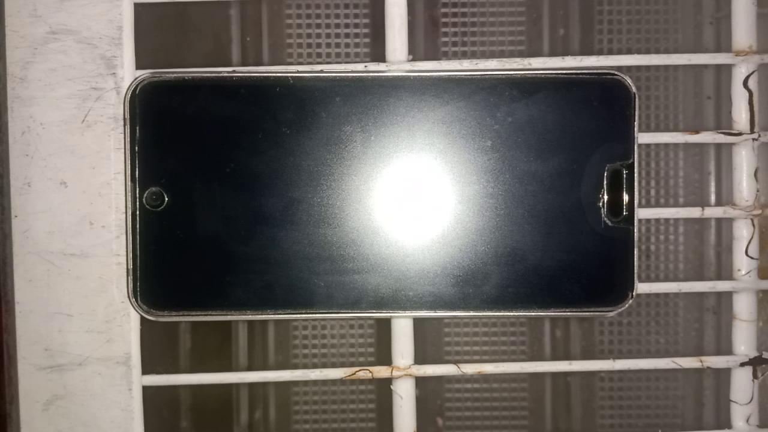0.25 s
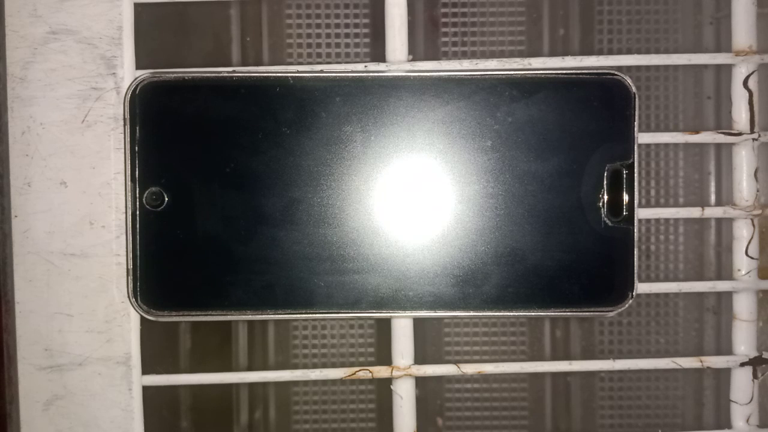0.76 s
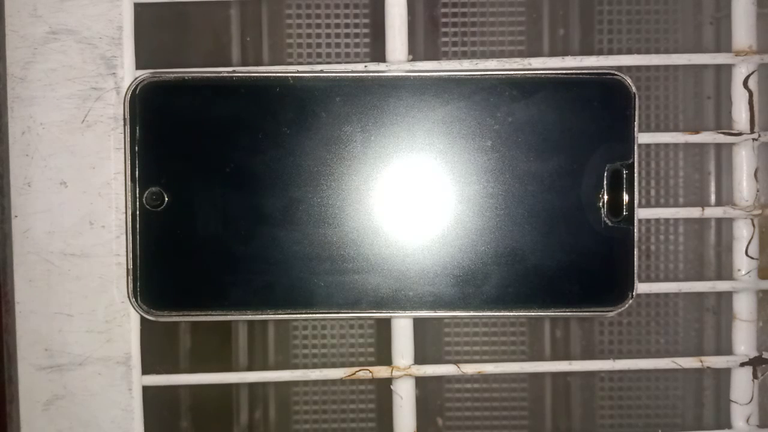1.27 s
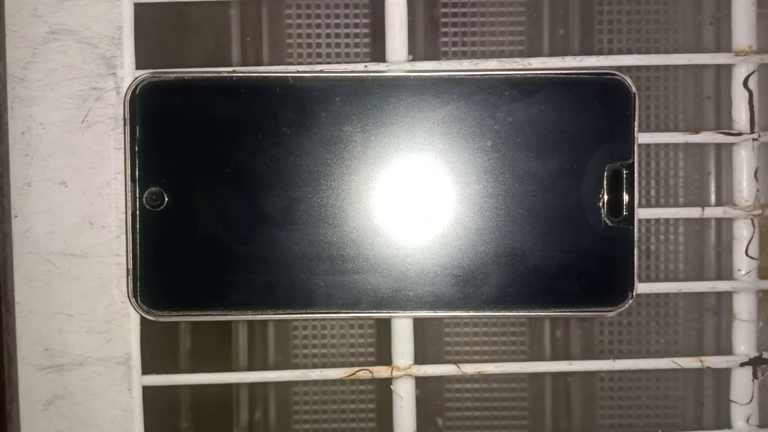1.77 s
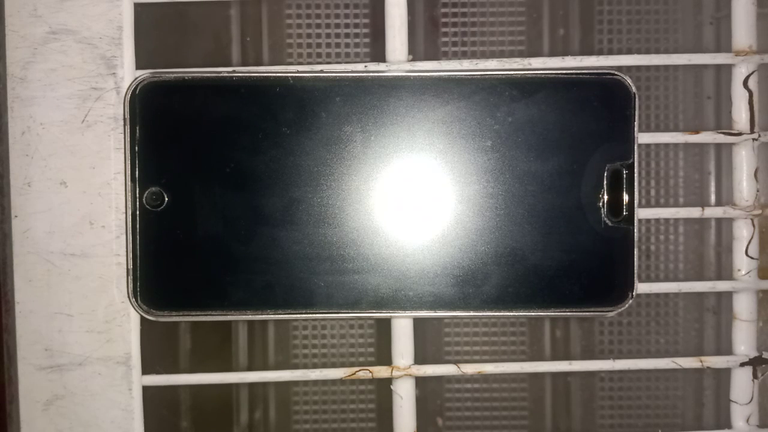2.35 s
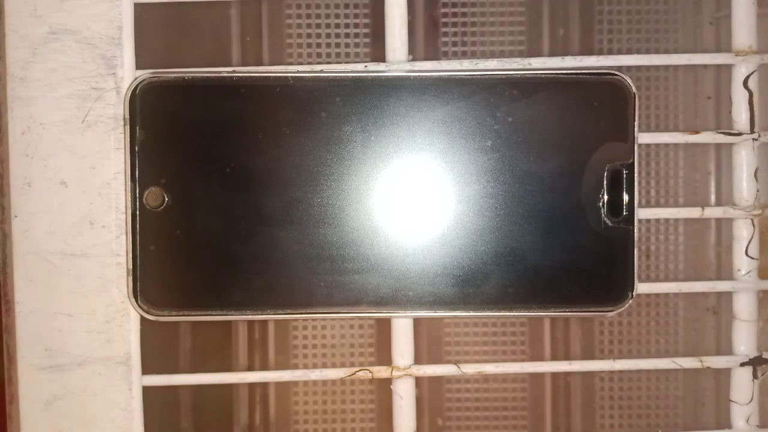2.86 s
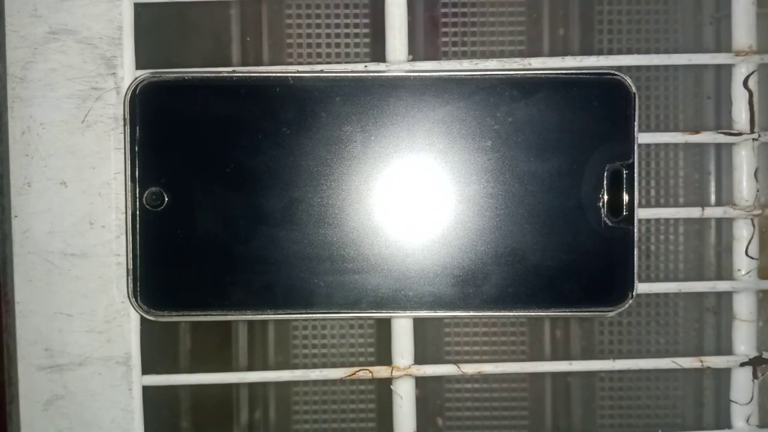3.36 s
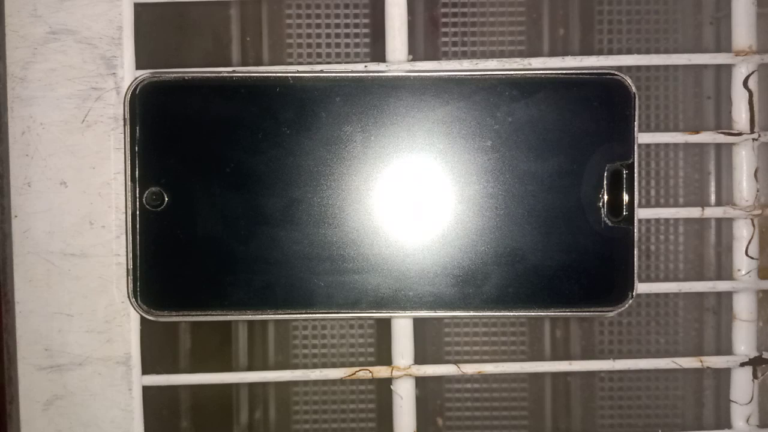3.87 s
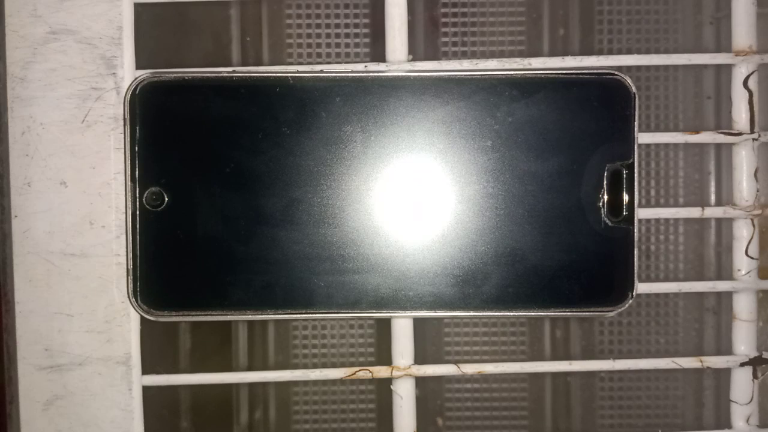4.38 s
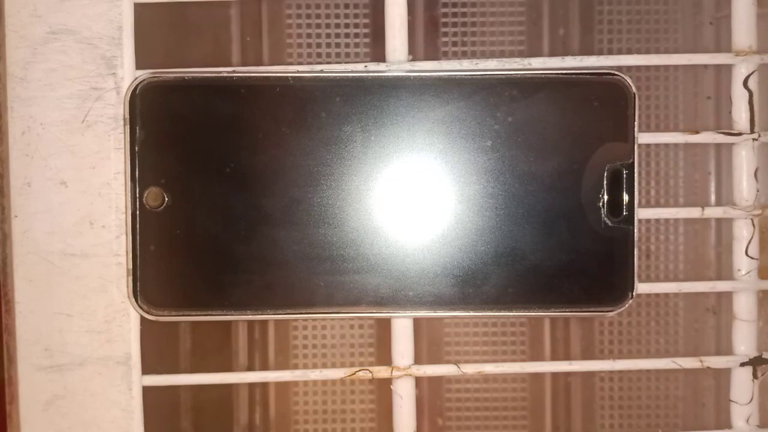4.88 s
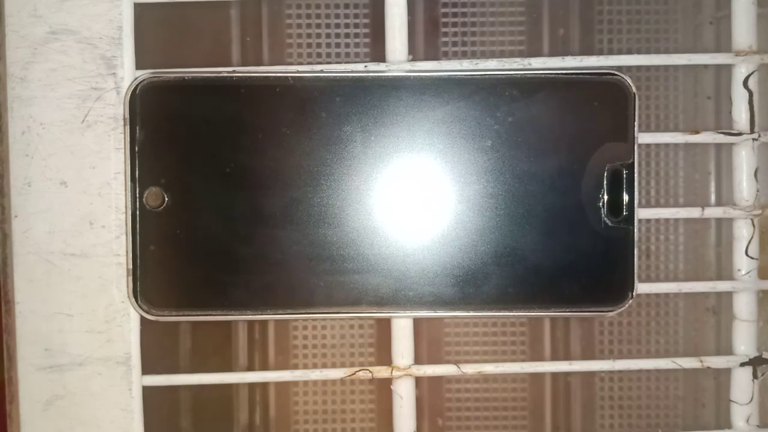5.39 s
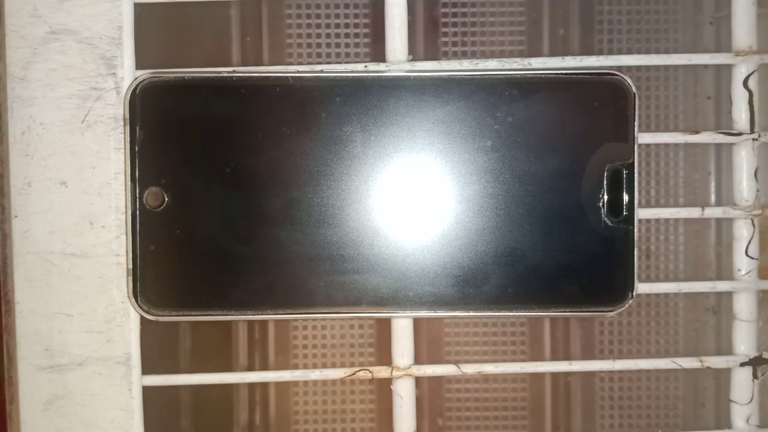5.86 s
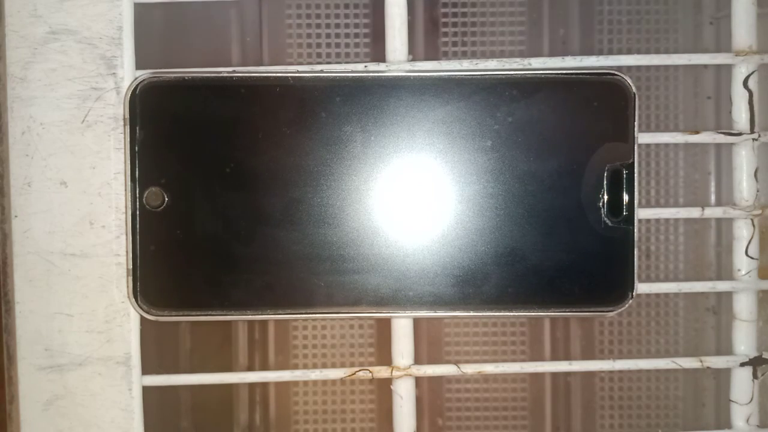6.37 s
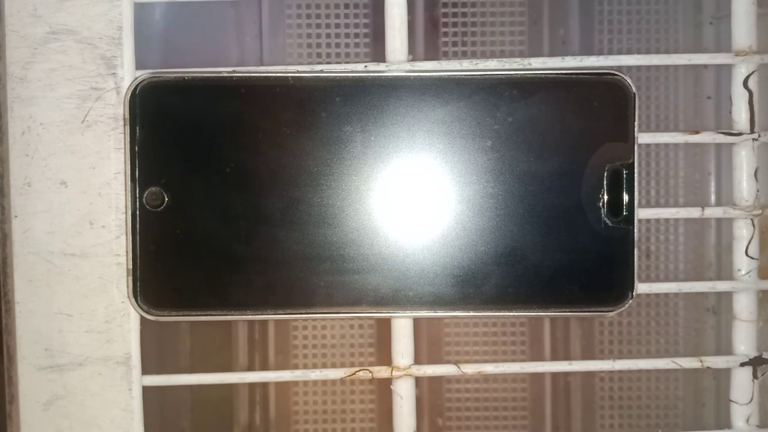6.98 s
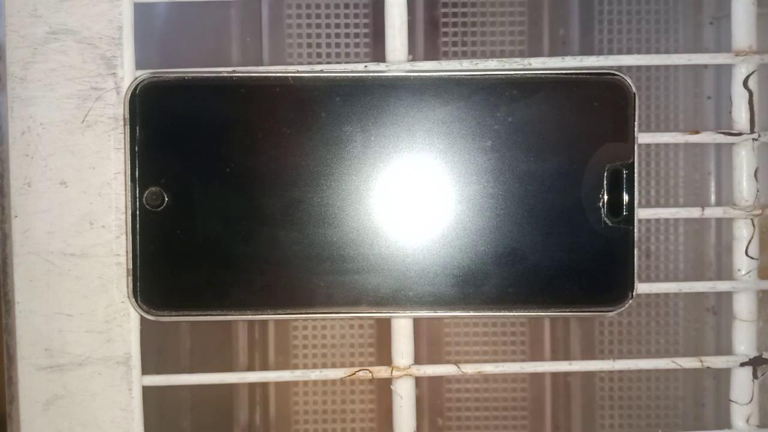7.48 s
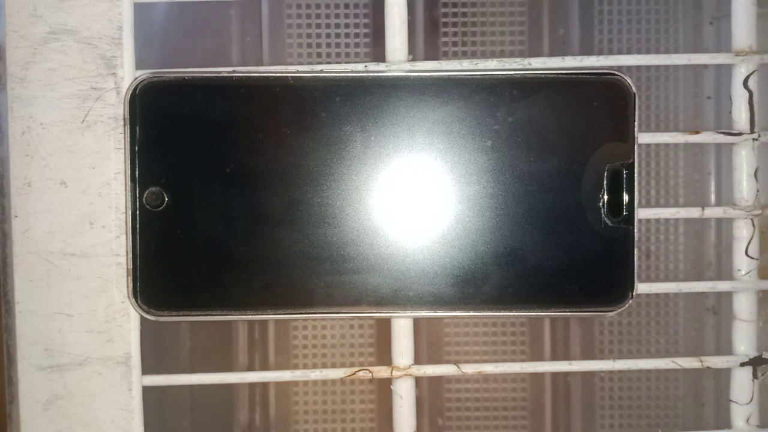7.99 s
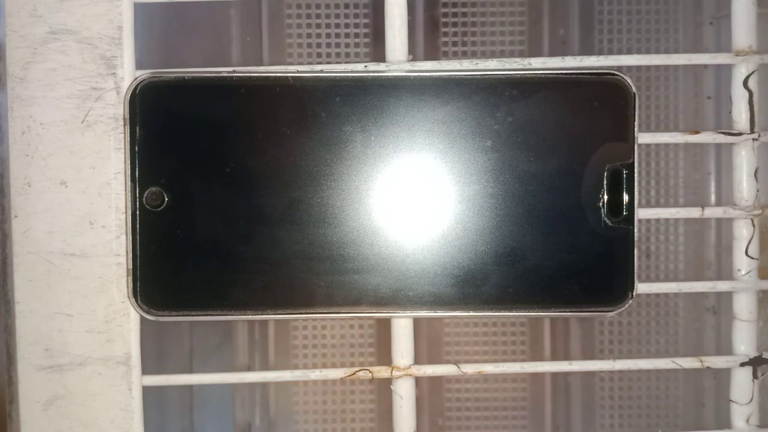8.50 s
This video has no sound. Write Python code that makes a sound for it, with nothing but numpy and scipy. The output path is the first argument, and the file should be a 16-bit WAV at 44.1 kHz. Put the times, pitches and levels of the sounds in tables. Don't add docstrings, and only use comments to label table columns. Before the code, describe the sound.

A refrigerator compressor runs throughout, heard close and dry by a hand-held microphone with little sense of room. From 0 to 0.8 s it is a thin airy hum with soft hiss, a low bump and knock near 0.3 s and a short finger scuff at 0.4 s. From 0.8 to 1.15 s thumps and a rapid cluster of hard casing knocks mark the set-down. Until 4.7 s a steadier, fuller drone continues, with a wavering mid-low panel tone, faint high whine, light rustles and tiny dry ticks. Knocks with brief metallic ringing come at 4.8, 5.25 and 5.8 s. From about 6 s the microphone slides toward the pump: low hum around 100 Hz swells strongly by 7.5 s, buzzing and beating, with more air noise. Small clicks at 7.8-7.9 s and 8.4 s, and a bright ping at 8.6 s, end it near 8.7 s, still humming.

```python
import sys
import numpy as np
from scipy import signal
from scipy.io import wavfile
from scipy.ndimage import uniform_filter1d

SR = 44100
rng = np.random.default_rng(int(sys.argv[2]) if len(sys.argv) > 2 else 0)


def bounce(signal):
    frames = np.transpose(np.atleast_2d(signal))
    limited = np.clip(frames, -1, 1)
    pcm = np.round(limited * 32767).astype(np.int16)
    wavfile.write(sys.argv[1], SR, pcm)


def gain_from_db(level_db):
    decades = np.asarray(level_db, float) / 20
    return 10 ** decades


N = 385434
T = np.arange(N) / SR
SHAFT_HZ, MAINS_HZ = 49.3846, 50.3
SEATED, NEAR, FACED = 1, 2, 3
# (time [s], length [s], rise [dB])
RUBS = [(0, 0.022, 14), (.15, .04, 5), (.285, .04, 7), (.99, 0.12, 12), (1.07, .06, 15.5), (1.24, .08, 5),
        (1.46, .22, 5), (2.63, .04, 6), (2.76, 0.08, 11), (3.03, .045, 11), (3.11, .055, 12), (3.2, .07, 8),
        (4.14, 0.15, -4), (4.69, .03, 5), (4.78, .03, 7), (5.31, .11, 12), (5.43, 0.085, 11),
        (6.29, .04, 5), (7.15, .06, 4), (7.83, 0.16, 4), (8.52, 0.034, 6), (8.68, .03, 5), (8.74, .04, 8)]


def evened(x):
    return x / np.sqrt(np.mean(x ** 2) + 1e-20)


def add(mix, s, sound):
    part = mix[round(s * SR):][:len(sound)]
    part += sound[:len(part)]


def band(x, lo_hz, hi_hz):
    return signal.sosfilt(signal.butter(4, [lo_hz, min(hi_hz, SR / 2.2)], "band", fs=SR, output="sos"), x)


def waver(rate_hz):
    t = T[::256]
    sines = 0
    for hz in np.geomspace(.2, 1, num=16) * rate_hz:
        sines = sines + np.sin(2 * np.pi * (hz * t + rng.random())) / np.sqrt(hz / rate_hz)
    return np.interp(T, t, evened(sines))


def tone(hz, db, turns, waver_db=0.):
    return np.sqrt(2) * gain_from_db(db + waver_db * waver(4)) * np.cos(2 * np.pi * (hz * T + turns))


def noise(points, patchy_db, flicker_db, size, peaks=()):
    hz = np.fft.rfftfreq(size, 1 / SR)
    real, imag, patches = rng.standard_normal((N // (size // 4) + 5, len(hz), 3)).T
    f, db = np.transpose(points)
    colour = np.interp(np.log(hz + 1), np.log(f + 1), db, left=-90, right=-90)
    for at_hz, width_hz, up_db in peaks:
        colour = colour + up_db / (1 + (2 * (hz - at_hz) / width_hz) ** 2)
    patches = uniform_filter1d(patches, size=8, axis=0)
    patches = evened(uniform_filter1d(patches, size=6, axis=1))
    flicker = rng.standard_normal(real.shape[1])
    spectra = (real + 1j * imag) * gain_from_db(colour[:, None] + patchy_db * patches + flicker_db * flicker)
    return evened(signal.istft(spectra, nperseg=size, noverlap=size - size // 4)[1][:N])


def placed(column):
    # (time [s], seated on the panel [0-1], nearness to the pump [0-1], turned to face it [0-1])
    path = [
        (0, 0.03, 0, 0),
        (.82, 0.14, 0, 0),
        (1.1, 0.98, 0, 0),
        (5.9, 0.98, 0, 0),
        (6.3, 0.96, 0.27, .15),
        (6.7, 0.97, 0.64, .33),
        (7.05, 1, 0.87, .52),
        (7.45, 1, 1, .78),
        (7.85, 1, 1, 1),
        (8.74, 0.98, 0.99, 1),
    ]
    table = np.transpose(path)
    return np.clip(np.interp(T, table[0], table[column]), 0, 1)


def heard(air_db, panel_db, pump_db, lateness, column=NEAR):
    return air_db + (panel_db - air_db) * placed(SEATED) + (pump_db - panel_db) * placed(column) ** lateness


def swells(rows, column=2, edge=2):
    t = T[::32]
    rises = sum(row[column] * np.exp(-abs(2 * (t - row[0]) / row[1]) ** edge) for row in rows)
    return np.interp(T, t, rises)


def crackle():
    grains_per_s = 9
    size = gain_from_db(3 * np.minimum(rng.exponential(1, N), 3)) * (rng.random(N) < grains_per_s / SR)
    kind, t = rng.integers(0, 3, N), T[:1500]
    out = np.zeros(N)
    for k, hz in enumerate((8500, 11000, 13000)):
        grain = band(gain_from_db(-60 * t / .04) * rng.standard_normal(len(t)), .88 * hz, 1.12 * hz)
        out += signal.oaconvolve(size * (kind == k), grain)[:N]
    return gain_from_db(-62) * out


def grip():
    # (frequency [Hz], level [dB])
    rustle_tone = [(5000, -19), (7400, -7.5), (8800, 4.5), (10500, -4.5), (11600, -4), (12200, -5.5),
                   (12900, -5), (13500, -5), (14300, -5.5), (15500, -5.5)]
    # (frequency [Hz], width [Hz], rise [dB])
    rub_modes = [(8500, 400, 4), (10600, 200, 4), (11600, 300, 8), (12800, 350, 9), (14100, 600, 7)]
    # (time [s], peak [dB], centre [Hz])
    ticks = [(0.2967, -51, 8160), (0.4359, -51, 9400), (0.9243, -40.5, 8300), (0.9777, -42, 8480),
             (1.0256, -38, 8600), (1.1199, -42, 8630), (1.4222, -47, 8940), (2.0672, -47, 8670),
             (2.6244, -50, 9450), (2.837, -46, 8390), (3.3902, -51, 8790), (3.7419, -52, 8780),
             (4.3774, -47, 5010), (4.776, -47, 8630), (4.8, -50, 8400), (5.245, -41, 8760),
             (5.3118, -52, 8430), (5.5972, -50, 8940), (5.9344, -47, 8300), (6.4398, -48.5, 8420),
             (7.4599, -47, 5430), (7.7657, -43, 8370), (7.8052, -37, 8860), (7.9194, -44, 8680)]
    # (time [s], peak [dB], centre [Hz])
    snaps = [(0.4718, -49.5, 12500), (0.9253, -47, 13100), (1.053, -48, 13400), (1.7255, -57, 13800),
             (2.624, -37.5, 13600), (2.6988, -54, 12900), (2.7846, -49, 12700), (3.0145, -54, 13900),
             (3.0849, -50, 12700), (3.3907, -53, 13600), (3.4715, -55, 13300), (3.8541, -51, 11100),
             (3.917, -50, 14000), (4.0093, -51, 14300), (4.3725, -54, 13000), (4.5121, -57, 13600),
             (4.5825, -50.5, 13600), (4.8618, -54.5, 13600), (5.0464, -50, 13200), (6.4926, -51.5, 12800),
             (7.001, -51, 13300), (7.1327, -50, 12000), (7.6031, -53, 12900), (7.7653, -46.5, 12800),
             (7.8047, -44, 12100), (7.9199, -52, 11200), (8.2851, -50.5, 13400), (8.5195, -40, 13000),
             (8.6223, -52, 12300), (8.6697, -50, 13200)]
    # (time [s], peak [dB], centre [Hz])
    faint_snaps = [(0.0717, -57, 9830), (0.2783, -56, 10000), (0.5586, -58, 10800), (0.6409, -57, 13900),
                   (1.1204, -50, 9800), (1.4207, -54, 9920), (1.7749, -56, 12800), (2.0323, -55, 12800),
                   (2.1161, -56, 14900), (2.5466, -57, 11600), (2.7362, -49, 12900), (2.9148, -59, 10900),
                   (2.9332, -57, 10800), (3.1737, -54, 14200), (3.2156, -54, 12800), (4.2454, -54, 14200),
                   (4.6748, -57, 11100), (4.7716, -54, 12800), (5.2594, -52, 12700), (5.6645, -59, 10000),
                   (6.2846, -56, 9970), (6.3919, -55, 14900), (6.4393, -53, 10100), (7.0399, -54, 10200),
                   (7.1082, -51, 13400), (7.1656, -52, 9880), (7.6655, -54, 10400), (8.6812, -51, 14500)]
    # (time [s], peak [dB], centre [Hz])
    taps = [(.925, -45, 6300), (2.0674, -47, 6600), (2.837, -50, 5900), (4.8, -54, 6490),
            (7.0359, -53, 5600), (7.8047, -44, 5660), (.44, -54, 6000), (1.03, -46, 6300),
            (3.74, -52, 6200), (3.858, -53, 5800), (4.378, -50, 6500)]
    # (from [s], to [s], level [dB])
    whistles = [
        (1.2, 2.55, -.5),
        (3.0, 4.75, -2),
    ]
    # (frequency [Hz], level [dB])
    circuit = [(7311, -91), (8398, -78), (9335, -80), (9728, -78), (9927, -92)]
    rub_db = heard(-74.5, -73.5, -68.5, lateness=1.5) + swells(RUBS, edge=4)
    out = gain_from_db(rub_db + 1.0) * noise(rustle_tone, 2.2, 1.6, size=256, peaks=rub_modes)
    t = T[:5000]
    # (events, t60 [s], half-width as a share of the centre, trim [dB])
    kinds = ((ticks, .06, .14, -10.5), (snaps, .07, .16, -9), (faint_snaps, .06, .11, -12), (taps, .05, .16, -11))
    for rows, t60, share, trim_db in kinds:
        for s, db, hz in rows:
            snap = evened(band(rng.standard_normal(len(t)), (1 - share) * hz, min((1 + share) * hz, 15100)))
            shape = (1 + .9 * np.exp(-t / 0.003)) * np.minimum(t / .001, 1)
            add(out, s, gain_from_db(db + trim_db - 60 * t / t60) * shape * snap)
    on = sum(gain_from_db(db) * np.clip(np.minimum(T - start, stop - T) / 0.06, 0, 1) for start, stop, db in whistles)
    return out + on * sum(tone(hz, db, rng.random(), 1.6) for hz, db in circuit)


def pings():
    # (time [s], peak [dB], frequency [Hz], t60 [s])
    struck = [(1.084, -25, 1045, 0.14), (4.8, -33, 2500, .06), (5.245, -29, 1750, .05),
              (5.249, -30, 1000, .06), (5.829, -38, 3130, .05), (7.852, -32, 3460, .035),
              (7.869, -29, 3370, 0.033), (7.894, -38, 3150, .025), (7.921, -44, 4780, 0.04),
              (8.392, -33, 2200, .06), (8.42, -37, 2400, .07), (8.615, -18, 2470, 0.036),
              (8.617, -31, 3340, 0.077), (8.62, -33, 1900, .07), (8.618, -32, 2930, .055),
              (8.6986, -33, 3370, 0.04)]
    out, t = np.zeros(N), T[:6000]
    for s, db, hz, t60 in struck:
        pair = np.sin(2 * np.pi * hz * t) + .35 * np.sin(2 * np.pi * (hz - 120) * t)
        add(out, s, gain_from_db(db + 2.5 - 60 * t / t60) * (1 - np.exp(-t / 0.0011)) * pair)
    return out


def thumps():
    # (time [s], peak [dB], frequency [Hz], length [cycles])
    pushes = [(0.2, -24, 62, 1.2), (.329, -21, 54, 1.1), (.331, -28, 262, 3.5), (0.355, -32, 199, 2.6),
              (.822, -25, 70, 1.8), (.85, -23.5, 134, 4.2), (0.863, -15, 258, 3.4), (.899, -27, 307, 4.2),
              (0.952, -24, 324, 5.3), (0.996, -23, 303, 4.1), (1, -27, 53.5, 1.7), (1.068, -13, 75.4, 0.88)]
    out = np.zeros(N)
    for s, db, hz, cycles in pushes:
        turns = hz * T[:round(cycles * SR / hz)]
        add(out, s - .004, gain_from_db(db) * np.hanning(len(turns)) * np.sin(2 * np.pi * turns))
    return out


def ring(upper_db):
    # (frequency [Hz], level [dB], t60 [s])
    casing_modes = [(700, 0, .07), (1036, 0, .07), (1670, -5, .055), (1830, -5, .055), (2010, -7, .05),
                    (2200, -6, .04), (2390, -5, .04), (2720, -11, .05), (2970, -13, .06), (3190, -11, .045),
                    (3800, -15, .05)]
    spread_db = 3
    t, out = T[:6000], 0
    for hz, db, t60 in casing_modes:
        strength, detune, phase = rng.random(3)
        level_db = db + upper_db * (hz > 1500) + spread_db * (2 * strength - 1)
        turns = hz * (.98 + .04 * detune) * t + .25 * phase
        out = out + gain_from_db(level_db - 60 * t / t60) * np.sin(2 * np.pi * turns)
    out = out * (1 - np.exp(-t / .0004))
    return max(gain_from_db(upper_db), 1) * out / abs(out).max()


def scuff():
    # (frequency [Hz], level [dB])
    scuff_tone = [(150, -41), (250, -1.5), (569, -3.5), (876, -4.5), (1190, -6.5), (1340, -4), (1440, -10),
                  (2160, -12), (2600, -35), (3380, -61), (5720, -120)]
    start_s, level_db, rise_s, hold_s, fade_db_per_s = 0.413, -26.5, .006, 0.032, 100
    since = T - start_s
    drag = np.clip(since / rise_s, 0, 1) * gain_from_db(level_db - fade_db_per_s * np.maximum(since - hold_s, 0))
    return drag * noise(scuff_tone, 1.6, .8, size=1024, peaks=[(716, 160, 6.5), (940, 61, 3)])


def knocks():
    # (time [s], peak at 400-1500 Hz [dB], relative level at 1.5-4.5 kHz [dB], t60 [s], rise [s])
    blows = [(.291, -35, 4, .1, .001), (.926, -27, 3, .1, .001), (.955, -22.5, -5, .13, .001),
             (.985, -26, -2, .12, .002), (1.019, -21, -3, .07, .001), (1.053, -16, 0, .08, .001),
             (1.064, -19, 2, .08, .001), (1.069, -21, 0, .07, .001), (1.076, -20, 0, .07, .001),
             (1.083, -16, -1, .1, .001), (1.1195, -12, -2.5, .075, .0006), (1.126, -19, -6, .11, .001),
             (4.77, -35, 5, .12, .001), (4.8, -25, 5, .07, .001), (4.808, -26, -10, .12, .002),
             (5.149, -28, -12, .1, .001), (5.2455, -16.5, -1, .085, .001), (5.759, -23.5, 2, .11, .001),
             (5.787, -25, -10, .09, .001), (7.804, -34, 1, .1, .001), (8.393, -38, 5, .12, .002),
             (8.6165, -38, 15, .12, .001)]
    # (frequency [Hz], width [Hz], rise [dB])
    casing = [(720, 145, 13), (1030, 73, 6), (1790, 280, 3.5), (2330, 520, 3)]
    grit_db, ring_db = -13, -4
    dull = noise([(300, -16), (450, -3.5), (1400, -0.5), (2000, -25)], 0.59, 1.1, size=512, peaks=casing)
    bright = noise([(1100, -33), (1500, 2.0), (3000, -1), (4300, -8), (4900, -19), (6800, -31)],
                   0.56, 0.5, size=512, peaks=casing)
    out, t = np.zeros(N), T[:12000]
    for s, db, upper_db, t60, rise in blows:
        shape = gain_from_db(-60 * t / t60) * (1 - np.exp(-t / rise)) * (1 + 0.84 * np.exp(-t / 0.0027))
        grit = (dull + gain_from_db(upper_db) * bright)[round(s * SR):][:len(t)]
        add(out, s, gain_from_db(db + grit_db) * shape[:len(grit)] * grit)
        add(out, s, gain_from_db(db + ring_db) * ring(upper_db))
    return out


def frame():
    # (time [s], length [s], low rumble [dB], upper rumble [dB])
    jolts = [
        (1.14, .4, 13, 2.5),
        (4.94, 0.35, -8, 1),
        (5.7, .7, 6, -4),
        (7.25, 0.49, 4, 4),
        (8.08, 0.34, -5.5, -3.5),
    ]
    low_db = heard(-59, -46.5, -53, lateness=1) + swells(jolts)
    high_db = heard(-54, -47.5, -36.5, lateness=0.4) + swells(jolts, column=3)
    out = gain_from_db(low_db + 6.0) * noise([(20, -31), (40, -17.5), (58, 12), (75, -18), (100, -36)], 2.8, 0.92, size=8192)
    upper_tone = [(55, -37), (80, -10), (110, -5.0), (135, -13.5), (170, -16), (400, -34.5)]
    out += gain_from_db(high_db + 6.0) * noise(upper_tone, 1.5, 0.85, size=8192, peaks=[(83.4, 7, 8.9), (120.5, 6.4, 12.6)])
    return out + gain_from_db(-54) * noise([(22, -32), (38, 0), (60, -6), (90, -26)], 1.5, .8, size=8192)


def panel():
    # (time [s], length [s], rise [dB])
    presses = [(.65, .15, 2), (.93, .25, 5), (1.25, .1, -5), (1.45, .1, -4), (1.85, .3, 3), (2.15, .1, 4),
               (2.5, .3, -2), (3.13, .2, 3), (3.37, .2, -6), (3.78, .2, -4), (4.4, .35, 4), (4.63, .1, 3),
               (5.05, .1, 5), (5.65, .1, -5), (5.93, .12, -4), (6.15, .22, 10), (6.4, .2, 5),
               (6.7, .26, 11), (7.03, .12, -3), (7.22, .2, 4), (7.85, .1, -5), (8.33, .2, 4),
               (8.6, .25, -5)]
    drone_db = heard(-41, -43.5, -42, lateness=1) + swells(presses)
    out = tone(306.3, drone_db - 2.5, .3 * waver(6), 1.5)
    return out + gain_from_db(drone_db - 5.5) * noise([(100, -40), (600, -40)], 1.1, 1.1, size=8192,
                                             peaks=[(306.5, 16, 37), (329, 14, 24), (288, 10, 20)])


def flow():
    # (frequency [Hz], level [dB])
    air_tone = [(130, 14.5), (190, -31), (250, -6), (400, -16.5), (500, -13), (800, -17), (930, -19.5),
                (1500, -20), (2300, -20.5), (3300, -23.5), (4100, -29.5), (4600, -37.5), (5100, -48.5),
                (5600, -60.5)]
    # (frequency [Hz], width [Hz], rise [dB])
    ducts = [(336.3, 22, 6.5), (465.3, 8.3, 12), (750, 240, 2.5), (1045, 30, 6.5), (1798, 47, 8),
             (2190, 185, 5.5), (3043, 53, 5)]
    # (frequency [Hz], level [dB])
    hiss_tone = [(4000, -20.5), (5000, -4), (6000, -8), (7400, -6.5), (8600, 1), (9800, -6), (11000, -9.5),
                 (14800, -14), (15600, -17.5)]
    rubs_db = swells(RUBS)
    set_down = np.exp(-(2 * (T - 1.012) / .3) ** 4)
    body_db = heard(-48, -45.5, -41.5, lateness=1.5) + 11.5 * set_down
    open_db = heard(-44, -43, -42, lateness=4) + 2.5 * set_down + .12 * rubs_db
    hiss_db = heard(-67, -66.5, -61.5, lateness=2) + 0.22 * rubs_db
    stroke = 1 + 0.062 * np.cos(2 * np.pi * (SHAFT_HZ * T + 0.42))
    air = stroke * noise(air_tone, 1.4, 1.0, size=2048, peaks=ducts)
    lower = signal.sosfiltfilt(signal.butter(2, 1200, fs=SR, output="sos"), air)
    out = gain_from_db(body_db + 6.0) * lower + gain_from_db(open_db + 5.0) * (air - lower)
    return out + gain_from_db(hiss_db - .4) * noise(hiss_tone, 1.6, .8, size=256)


def compressor():
    # (multiple of shaft speed [1], level [dB])
    orders = [(4, -52), (6, -55), (7, -57), (8, -73), (9, -71), (10, -54.5), (12, -63), (15, -57),
              (20, -67.5), (22, -57.5), (23, -62), (24, -64.5), (25, -52.5), (29, -59), (30, -85.5),
              (33, -71.5), (34, -65)]
    # (multiple of mains frequency [1], level [dB])
    mains = [(4, -59.5), (7, -54.5), (9, -56), (10, -61), (11, -74), (13, -58.5), (16, -60.5)]
    loose, near, faced = 1 - placed(SEATED), placed(NEAR), placed(FACED)
    first_db = heard(-44.5, -32, -52, lateness=.6)
    out = tone(SHAFT_HZ, first_db, -0.3 + .14 * near - .22 * loose, 0.63)
    second_db = heard(-46.5, -31.5, -19.3, lateness=1.2) + 1.5 - 1.5 * (1 - near) - 2.7 * faced ** 4
    out += tone(2 * SHAFT_HZ, second_db, -0.46 + .345 * faced, 0.09)
    hum_db = heard(-52, -43.5, -23, lateness=.55, column=FACED)
    out += tone(2 * MAINS_HZ, hum_db, 0.26 - .25 * near - .22 * np.exp(-((near - .72) / .2) ** 2))
    third_db = heard(-45.5, -47, -35.5, lateness=1, column=FACED)
    out += tone(3 * SHAFT_HZ, third_db, 0.28 - 0.2 * faced, 0.55)
    sideband_db = heard(-67, -64, -36.5, lateness=.9, column=FACED)
    out += tone(4 * MAINS_HZ - SHAFT_HZ, sideband_db, -0.39, 0.82)
    out += tone(2 * MAINS_HZ + SHAFT_HZ, heard(-56, -63, -44, lateness=1.5), .5, .8)
    whine_db = heard(-50.5, -42.7, -37, lateness=1.3)
    out += tone(28 * SHAFT_HZ, whine_db, 0.37 - 0.27 * faced ** .6 + .25 * loose, 0.45)
    dead_spot_db = -5.5 * np.exp(-((faced - .72) / .25) ** 2)
    out += tone(27 * SHAFT_HZ, -44.8 + dead_spot_db, 0.31 - .1 * near, 0.4)
    out += tone(6 * MAINS_HZ, heard(-44, -44.5, -40.5, lateness=0.1), -.37, 1.2)
    out += sum(tone(k * SHAFT_HZ, db, rng.random(), 1.6) for k, db in orders)
    return out + sum(tone(k * MAINS_HZ, db, rng.random(), 1.6) for k, db in mains)


def scene():
    handling = crackle() + grip() + pings() + thumps() + scuff() + knocks()
    machine = frame() + panel() + flow() + compressor()
    return (handling + machine)[None]


def roll_off(x):
    return signal.sosfilt(signal.butter(12, 15540, fs=SR, output="sos"), x)


def record(dry):
    return roll_off(dry)


dry = scene()
out = record(dry)
bounce(out)
```